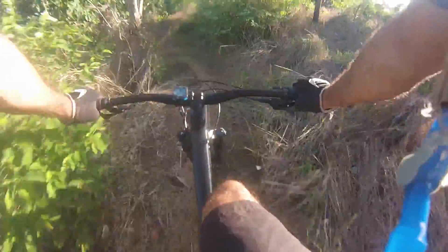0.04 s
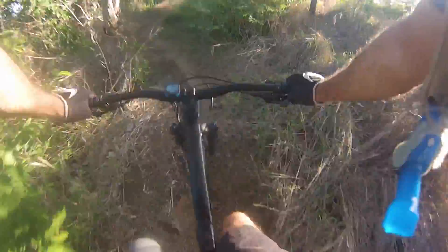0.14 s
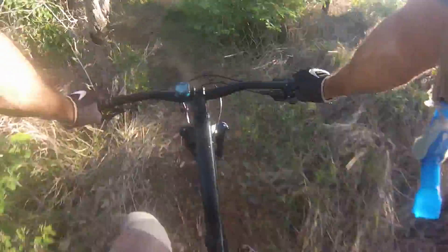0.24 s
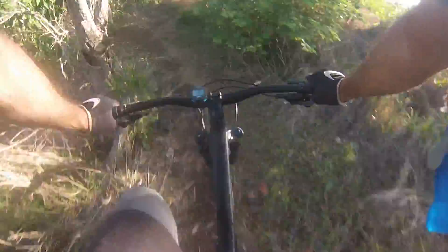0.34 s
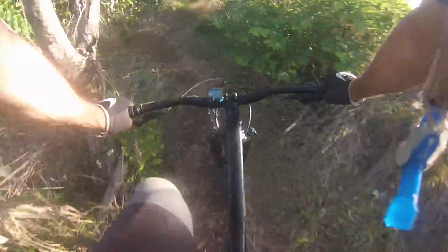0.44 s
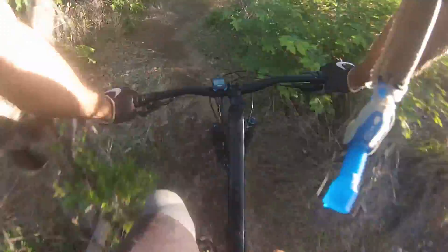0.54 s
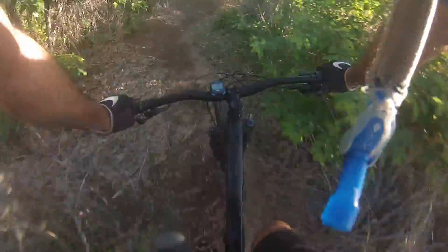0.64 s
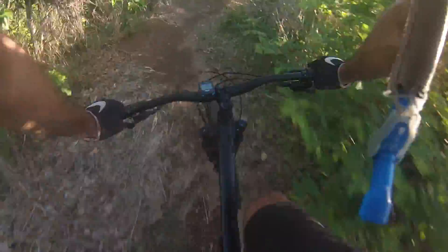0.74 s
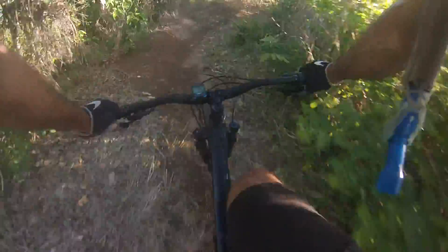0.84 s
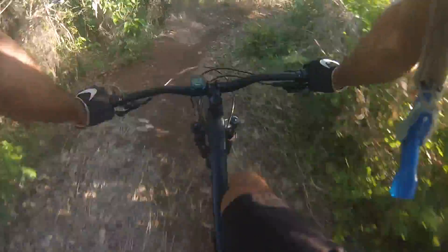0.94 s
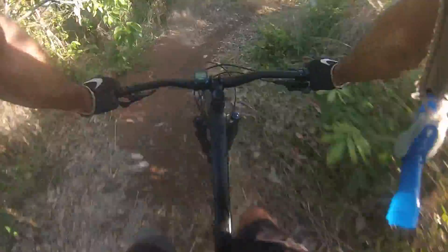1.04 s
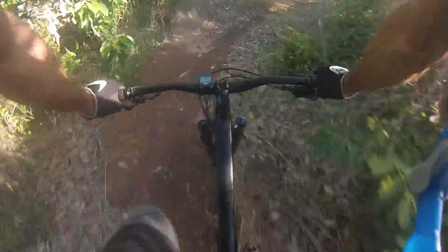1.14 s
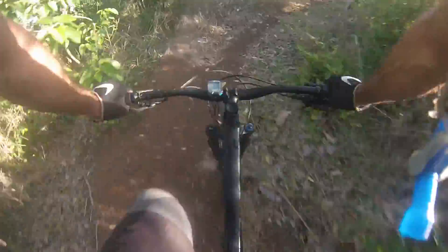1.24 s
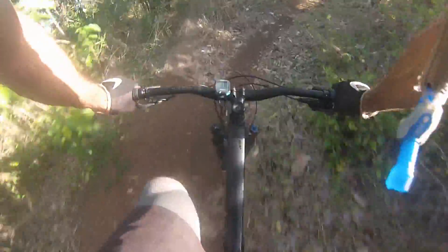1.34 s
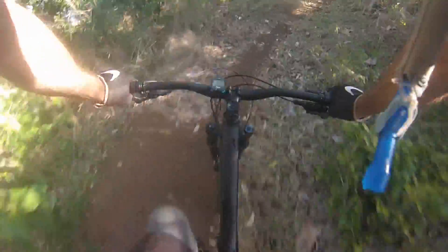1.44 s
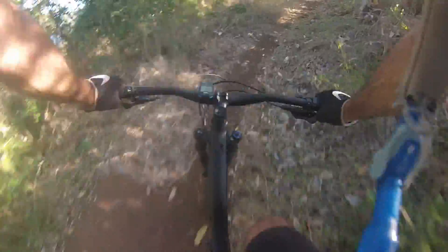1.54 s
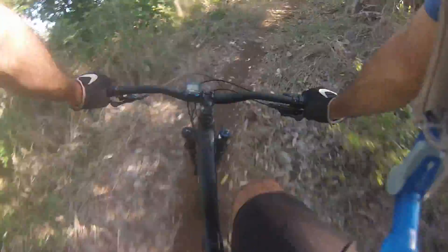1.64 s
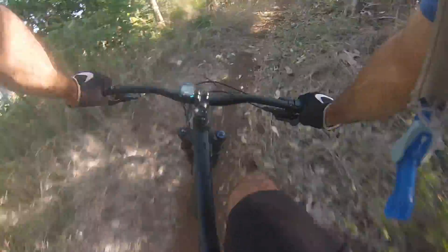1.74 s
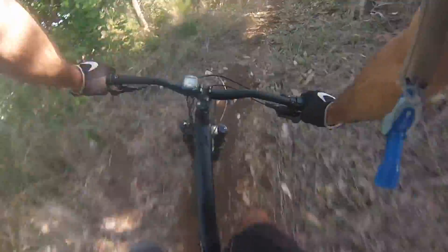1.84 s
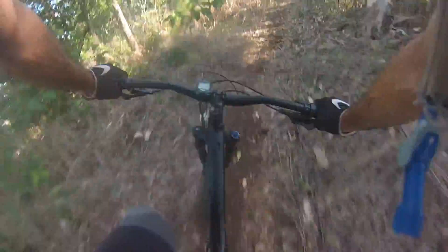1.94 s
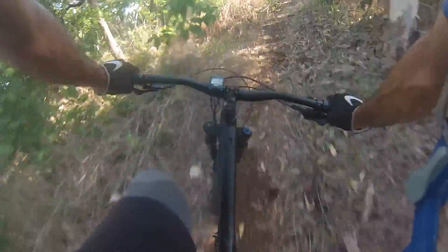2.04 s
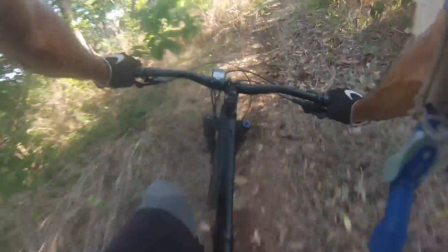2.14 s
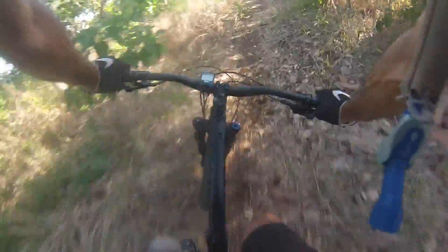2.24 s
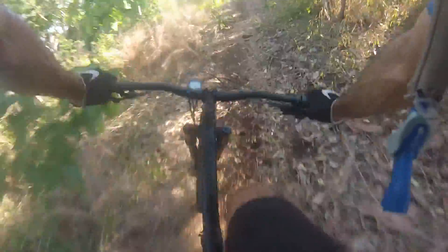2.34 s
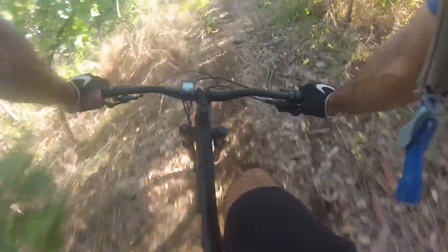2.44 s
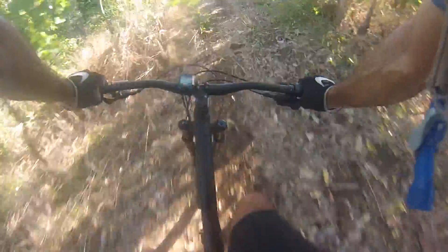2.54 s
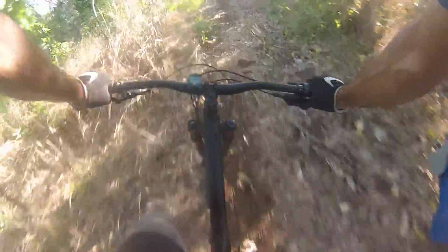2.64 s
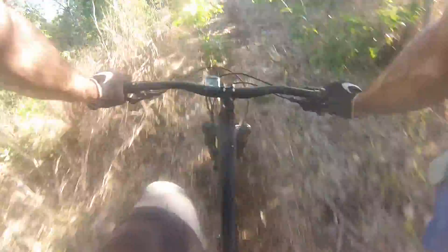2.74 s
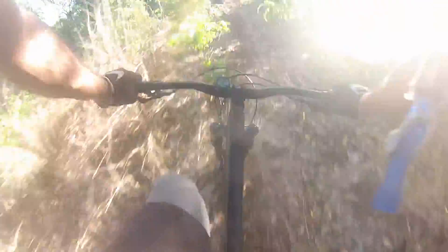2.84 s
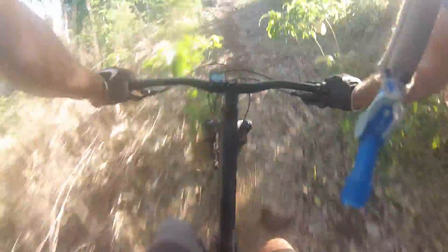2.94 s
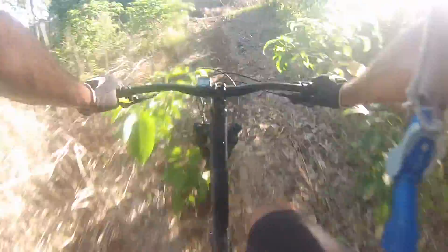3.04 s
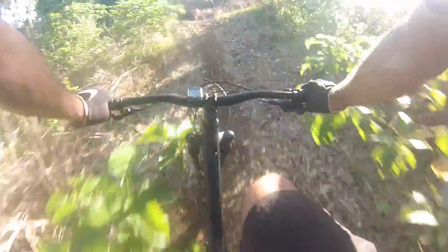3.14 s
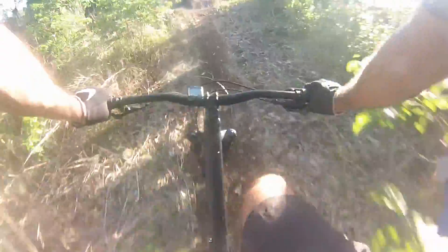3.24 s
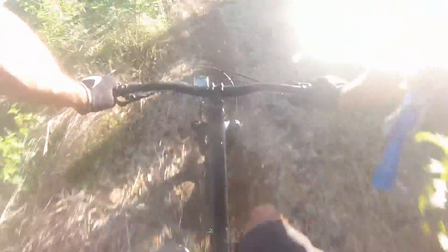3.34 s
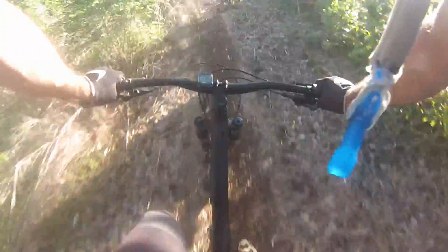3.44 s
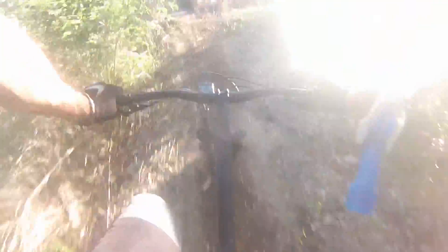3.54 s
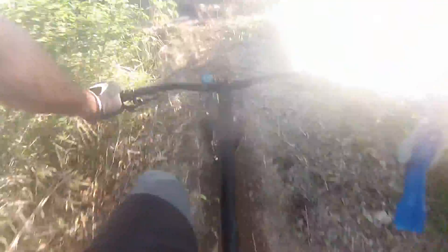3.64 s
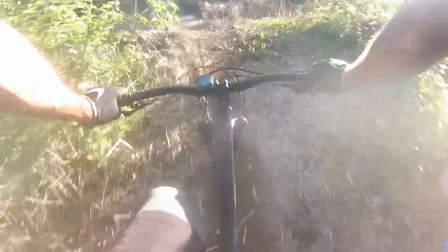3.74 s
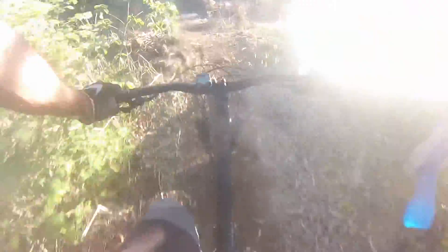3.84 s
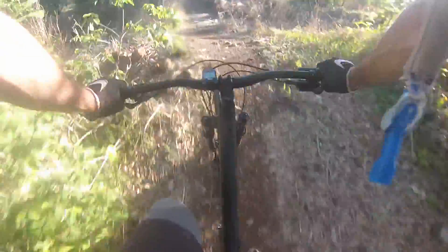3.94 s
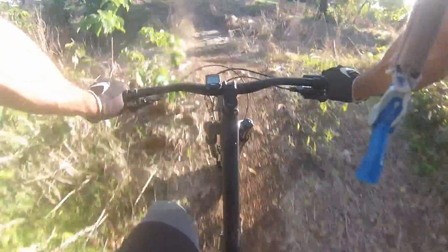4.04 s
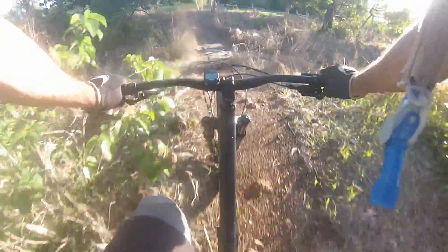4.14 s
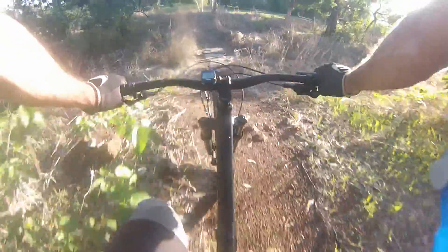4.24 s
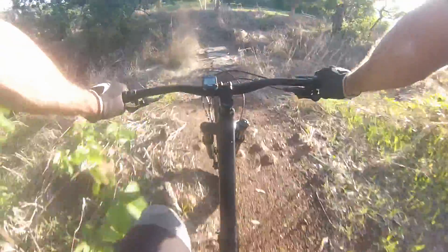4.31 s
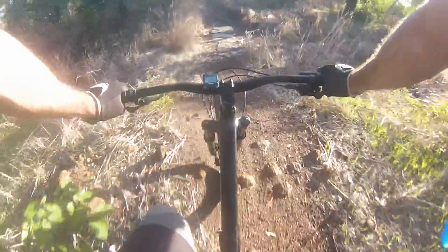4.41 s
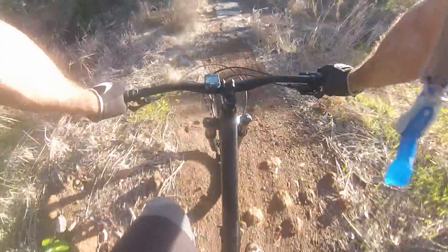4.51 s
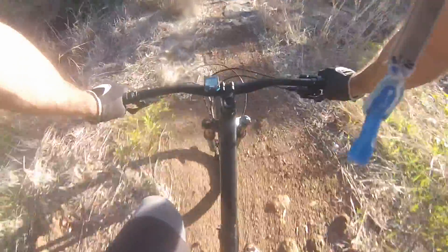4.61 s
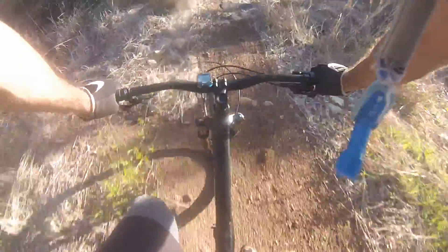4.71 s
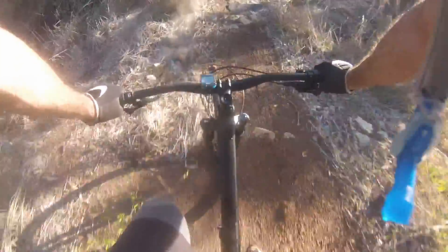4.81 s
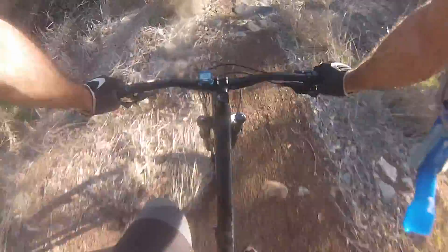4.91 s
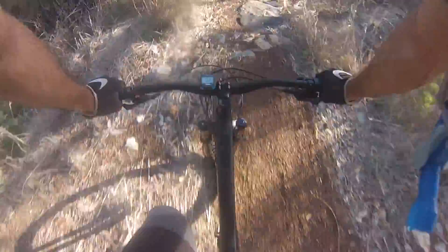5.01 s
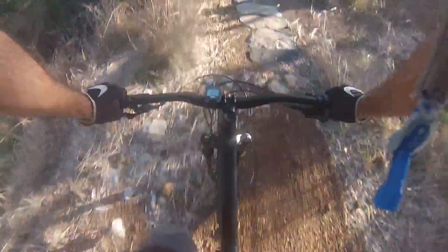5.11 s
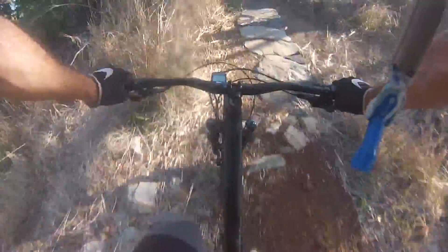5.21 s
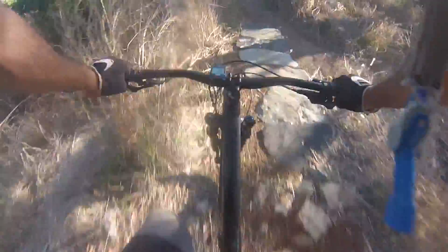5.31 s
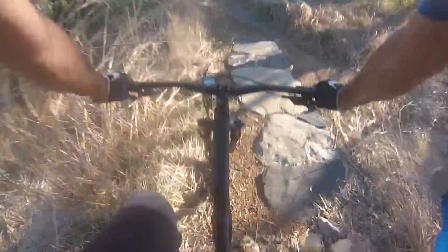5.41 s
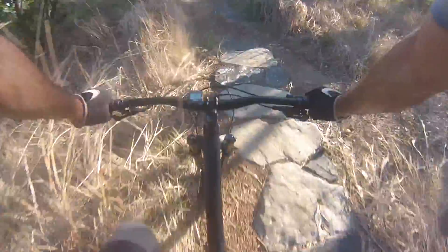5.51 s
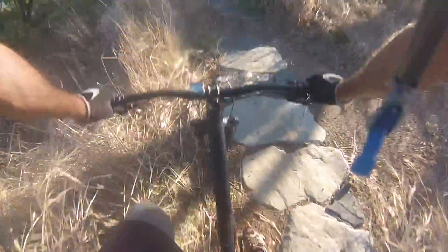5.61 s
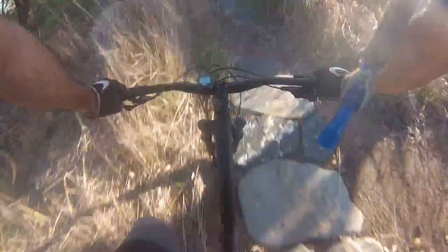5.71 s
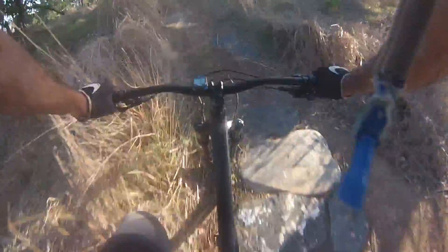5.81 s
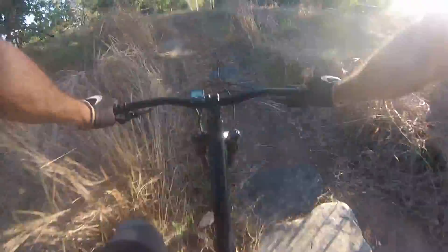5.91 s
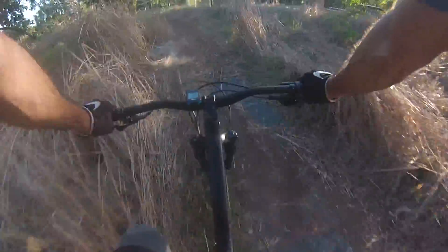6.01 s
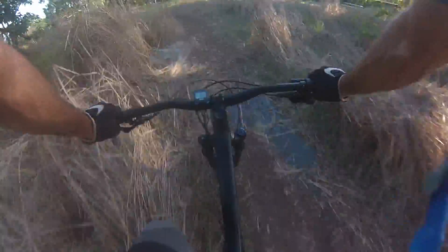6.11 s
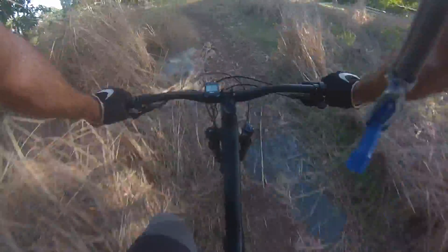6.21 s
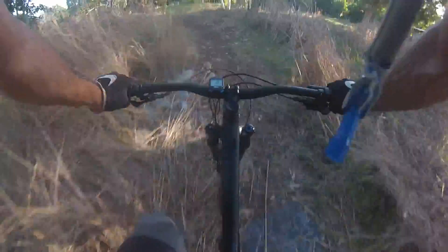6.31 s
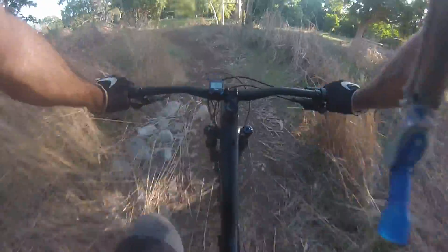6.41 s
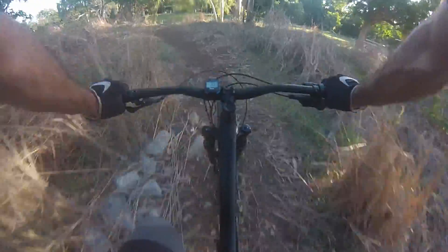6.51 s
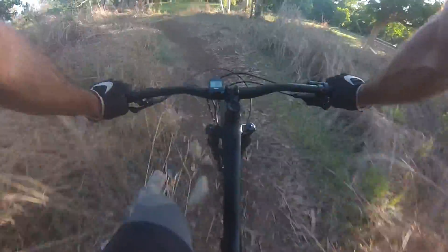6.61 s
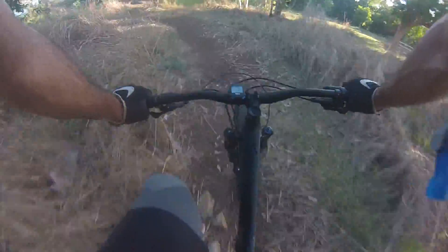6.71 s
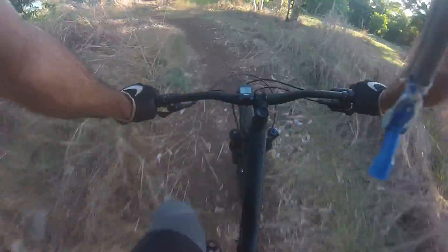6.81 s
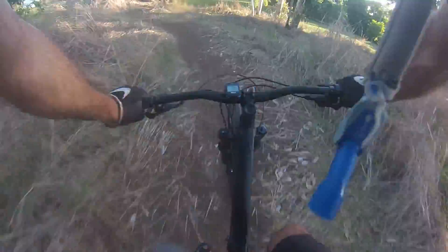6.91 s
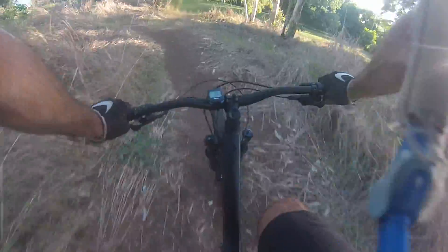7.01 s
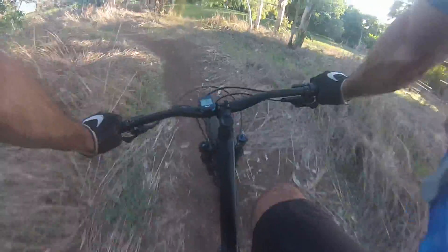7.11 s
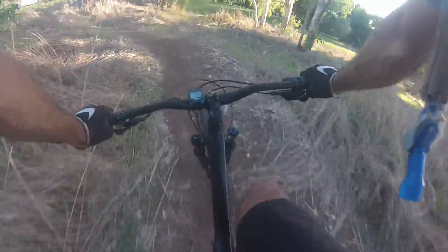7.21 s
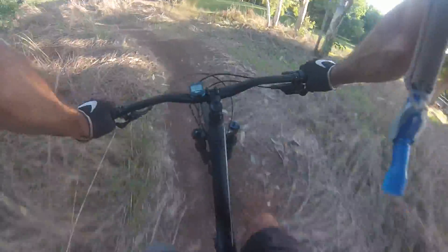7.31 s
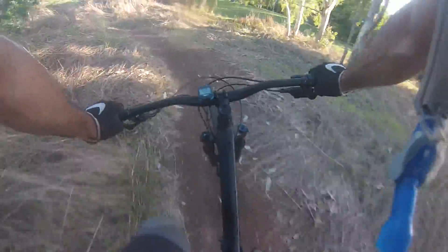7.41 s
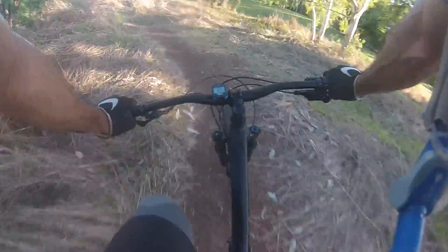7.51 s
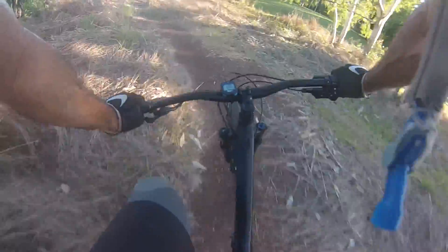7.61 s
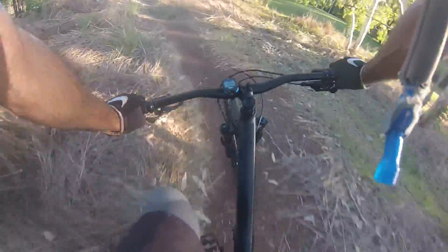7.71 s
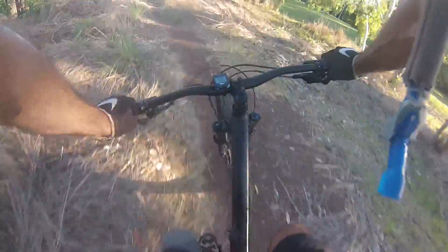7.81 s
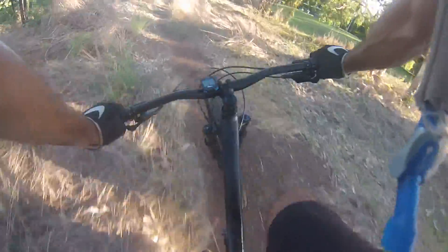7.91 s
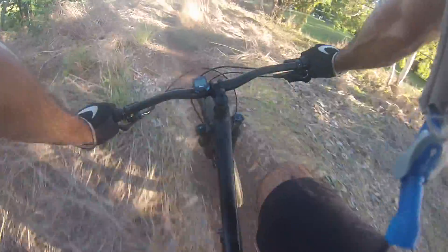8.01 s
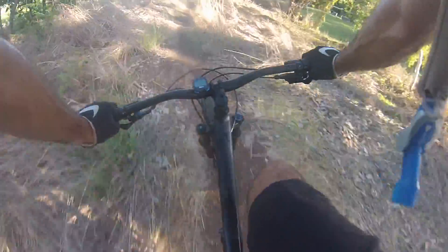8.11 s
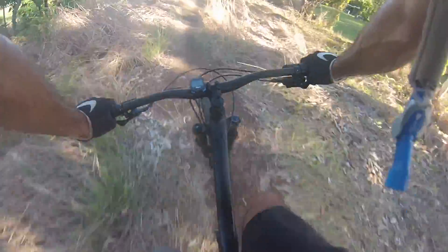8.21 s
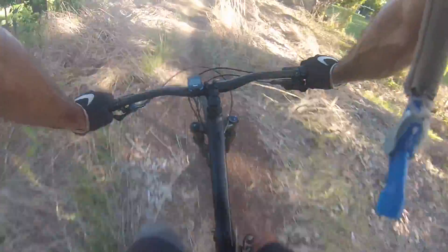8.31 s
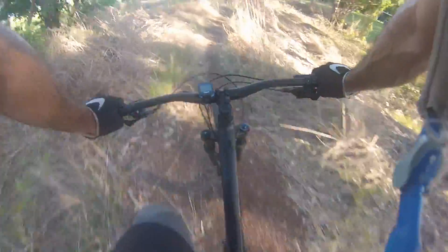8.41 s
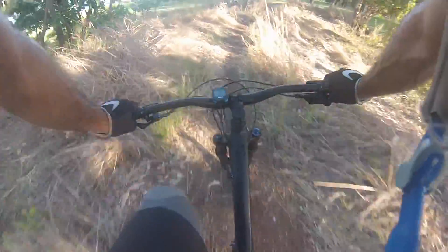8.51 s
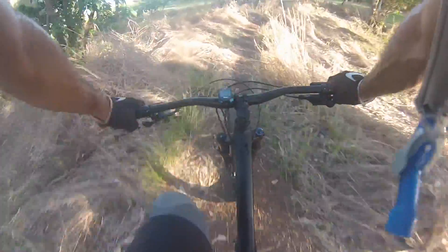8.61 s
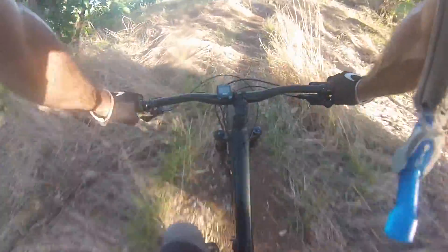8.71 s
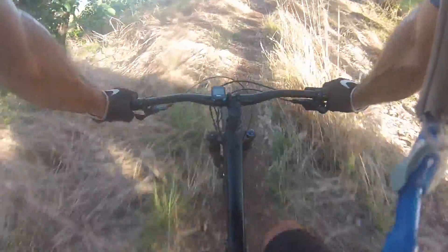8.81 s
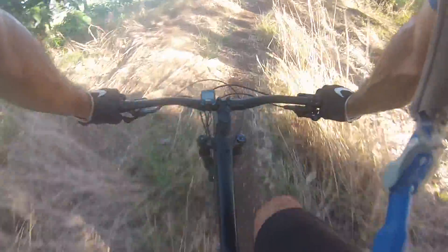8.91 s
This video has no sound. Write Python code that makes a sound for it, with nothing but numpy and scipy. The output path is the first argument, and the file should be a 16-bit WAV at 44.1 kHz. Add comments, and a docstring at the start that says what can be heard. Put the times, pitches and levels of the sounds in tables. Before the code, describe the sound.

A mountain bike rolls along a bumpy dirt trail, heard quiet and muffled from inside a closed camera case on the rider's chest. Tyres crunch over a low rumble, with small frame knocks and a fast, dull heartbeat underneath. Grass swishes and twigs flick the case. Just past the middle, stone slabs bring a cluster of heavy thumps and clatter, then the lighter crunching and rattling carries on.

```python
"""A bumpy dirt trail, heard from inside a closed camera case strapped to a rider's chest.
Brushing grass, tyre crunch and knocks arrive muffled and excite the resonances of case and frame.
The harness sways, hums and thuds, and the rider's heartbeat is conducted through it into the case.
Bumps throw the case back and forth; a stone slab gives a heavy jolt and a clatter."""
import sys
import numpy as np
from scipy import signal
from scipy.fft import rfft, irfft, next_fast_len
from scipy.io import wavfile

SR = 44100
rng = np.random.default_rng(int(sys.argv[2]) if len(sys.argv) > 2 else 0)


def output_pcm(signal):
    """Save a mono or channel-first signal as 16-bit PCM at the path in sys.argv[1].

    Samples are clipped to [-1, 1] before scaling.
    """
    pcm = np.clip(np.atleast_2d(signal).T, -1, 1) * 32767
    wavfile.write(sys.argv[1], SR, np.round(pcm).astype(np.int16))


N = 394682


def from_db(db):
    """Decibels to amplitude ratio."""
    return 10 ** (np.asarray(db) / 20)


def unit_rms(x):
    """Normalisation to rms 1."""
    return x / np.sqrt(np.mean(x ** 2) + 1e-20)


def curves(rows):
    """Linear interpolation of each column over time."""
    times_s, *columns = np.transpose(rows)
    return [np.interp(np.arange(N) / SR, times_s, column) for column in columns]


def lowpass(x, order, cutoff_hz):
    """Attenuation of the treble."""
    return signal.sosfilt(signal.butter(order, cutoff_hz, fs=SR, output="sos"), x)


def drift(rate_hz):
    """Slow random fluctuation: low-passed noise of rms 1."""
    step = 40
    pole = np.exp(-2 * np.pi * rate_hz * step / SR)
    slow = signal.lfilter([1], [1, -2 * pole, pole ** 2], rng.standard_normal(N // step + 2002))[2000:]
    return np.interp(np.arange(N) / step, np.arange(len(slow)), unit_rms(slow))


def coloured_noise(spectrum):
    """Spectral shaping of white noise, at rms 1."""
    hz, db = np.transpose(spectrum)
    size = next_fast_len(N)
    log_hz = np.log(np.arange(size // 2 + 1) * SR / size + 1)
    gain = from_db(np.interp(log_hz, np.log(hz), db))
    return unit_rms(irfft(rfft(rng.standard_normal(size)) * gain, size)[:N])


def resonate(force, modes, tilt_db=0):
    """Modal superposition with alternating signs, tilted by tilt_db per octave about 1800 Hz."""
    out = 0
    for k, (hz, width_hz, db) in enumerate(modes):
        radius = np.exp(-np.pi * width_hz / SR)
        zeros = (1 - radius ** 2) / 2 * np.array([1, 0, -1])
        poles = [1, -2 * radius * np.cos(2 * np.pi * hz / SR), radius ** 2]
        gain = from_db(db + tilt_db * np.log2(hz / 1800))
        out = out + (-1) ** k * gain * signal.lfilter(zeros, poles, force + 1e-18)
    return out


def grains(per_s, spread_db):
    """Shot noise: random contacts of uneven size."""
    sizes = from_db(spread_db * np.minimum(rng.exponential(1, N), 5)) * rng.choice([-1, 1], N)
    return sizes * (rng.random(N) < per_s / SR)


def impact(modes, decay_s, cutoff_hz, tilt_db=0):
    """Impact excitation: a brief rough force rings the modes; soft contact lowers its cutoff."""
    t = np.arange(SR // 5) / SR
    envelope = np.exp(-t / decay_s) * (1 - np.exp(-8 * t / decay_s))
    force = lowpass(rng.standard_normal(len(t)) * envelope, 4, cutoff_hz)
    return resonate(force, modes, tilt_db)


def add(out, start_s, sound, peak_db):
    """Superposition of a short sound at a given peak level."""
    i = round(start_s * SR)
    out[i:i + len(sound)] += (from_db(peak_db) * sound / np.abs(sound).max())[:N - i]


# Microphone noise: frequency_hz, density_db
HISS_SPECTRUM = [(500, 0.5), (1000, -12), (2600, -6.5), (3200, -4.5), (4500, -4.5), (7000, -11),
                 (11400, -10.5), (13000, -10)]

def microphone_hiss():
    """Self-noise of the microphone: a steady floor."""
    return from_db(-81) * coloured_noise(HISS_SPECTRUM)


# Resonances of the case's vent: pitch_hz, bandwidth_hz, gain_db
VENT_MODES = [(3098, 76, -8.5), (3694, 270, -12), (4950, 204, -14.5), (5713, 120, -9), (6210, 114, -6.5),
              (7240, 1020, -14.5), (8330, 1430, -19), (10800, 1300, -28.5)]
# Grass along the trail: time_s, level_db, crispness_db_per_octave
GRASS_SWISH = [(0, -80, -2), (.2, -85.5, 5), (1.3, -84.5, 6), (2.09, -82.5, 2), (2.42, -73, 4.5),
               (2.62, -78, 3.5), (3.3, -77, 0), (3.45, -82, 3), (3.7, -76.5, 2), (4.15, -75.5, 4.5),
               (4.38, -79, 7), (4.5, -81.5, 6.5), (5.05, -82.5, 6), (5.35, -78, -7), (5.7, -83.5, -5),
               (6.3, -83.5, 0), (6.86, -86.5, -5), (8.25, -87, -4), (8.95, -89, 3)]

def grass_swish(clumps):
    """Friction noise: brushing grass excites the vent's modes."""
    level_db, crisp_db = curves(GRASS_SWISH)
    swish = resonate(rng.standard_normal(N), VENT_MODES, crisp_db)
    swish /= from_db(crisp_db * np.log2(6200 / 1800))  # moves the tilt's pivot to 6200 Hz
    return from_db(level_db + 1.2 * clumps) * unit_rms(swish)


# Grass and twigs striking the case: start_s, peak_db, pitch_hz, decay_s, crispness_db_per_octave
TWIG_FLICKS = [(.0, -68, 3570, 0.11, -1), (0.141, -58.5, 3680, 0.0045, -6), (.184, -69, 6270, 0.0055, 0.1),
               (2.9014, -48, 3660, 0.0012, -25), (3.048, -67, 3600, 0.0074, -5),
               (3.235, -63, 5650, 0.033, -4), (3.266, -56, 5760, 0.046, -8), (3.303, -59, 3240, 0.014, 0),
               (3.338, -60, 6140, 0.028, -7), (3.367, -55.5, 5170, 0.0086, -16),
               (3.543, -64, 4470, 0.011, 10), (3.603, -56.5, 5540, .006, 1),
               (3.616, -52, 5840, 0.0018, -12.5), (3.729, -62, 5740, 0.011, -1),
               (3.751, -66, 3700, 0.013, -4), (3.894, -52.5, 6070, 0.0056, -4),
               (3.909, -49, 5720, 0.0034, 1), (5.39, -59.5, 3580, 0.006, -9),
               (5.516, -59.5, 3500, 0.016, -20), (5.804, -65, 3640, 0.0049, -3),
               (5.882, -64.5, 3960, 0.0069, -11), (7.831, -50.5, 4800, 0.0067, 14),
               (7.832, -53, 3620, 0.0064, 1), (8.623, -68, 3670, .006, -4)]

def twig_flicks():
    """Light impacts: each rings the vent's modes and one pitch of its own."""
    out = np.zeros(N)
    for start_s, peak_db, pitch_hz, decay_s, crisp_db in TWIG_FLICKS:
        modes = VENT_MODES + [(pitch_hz, 300, 0.5)]
        add(out, start_s, impact(modes, decay_s, cutoff_hz=12400, tilt_db=crisp_db), peak_db)
    return out


# Resonances of case and frame: pitch_hz, bandwidth_hz, gain_db
CASE_MODES = [(1142, 228, -7.5), (1382, 121, 4), (1922, 170, 0.5)]
FRAME_MODES = [(2082, 96, 3.5), (2352, 240, 1), (3674, 97, -12)]
# Ground under the tyres: time_s, level_db, hardness_db_per_octave, frame_gain_db
TRAIL_SURFACE = [(0, -72, 3, 0), (.25, -73, -1, -1), (.6, -76, -3, -3), (.95, -69.5, 0.5, -5),
                 (1.08, -77.5, 7, -2), (1.15, -72, -7, -4.5), (1.48, -73, -6.5, -2.5),
                 (1.6, -69, -6.5, -2.5), (2.07, -67, -4, -4.5), (2.58, -68, 1, -2.5),
                 (2.66, -72.5, -9, -3.5), (2.95, -67, -5, -4.5), (3.2, -65, 7, -6), (3.3, -62, -1.5, -1),
                 (3.43, -70.5, -5, -4), (3.75, -62.5, 5.5, -4.5), (4.22, -72, -3, -0.5), (4.5, -76, 9, -3),
                 (5.05, -72.5, -4, -0.5), (5.22, -64, 0.5, -5.5), (5.42, -64, 4.5, -2.5),
                 (5.62, -64.5, 2, 2), (5.75, -70, 4, 0.5), (5.82, -64, 1.5, 2), (6.08, -74, 2, -4),
                 (6.4, -73.5, 2, -1), (6.8, -66, 2, -5.5), (7.2, -63, 10.5, -7), (7.3, -72, -2.5, -4.5),
                 (7.7, -70.5, -2, -7.5), (8.06, -63, 10.5, -13), (8.12, -69.5, 4, -9), (8.3, -67.5, 0, -5),
                 (8.75, -73.5, 4, -3.5), (8.95, -70, 1, -6.5)]

def tyre_crunch(clumps):
    """Granular noise: dirt, dry leaves and stones under the tyres ring the case and frame."""
    level_db, hard_db, frame_db = curves(TRAIL_SURFACE)
    grit = unit_rms(grains(900 * from_db(3.0 * clumps), spread_db=3.0)) + 1.02 * rng.standard_normal(N)
    grit += 0.45 * unit_rms(grains(70, spread_db=2.5))  # pebbles and twigs snap
    muffled = lowpass(grit, 3, cutoff_hz=2620)  # transmission loss of the case wall
    case_ring = resonate(muffled, CASE_MODES, hard_db + 2.1 * drift(14))
    frame_clang = from_db(frame_db) * resonate(muffled, FRAME_MODES)
    return from_db(level_db + 1.74 * drift(25)) * unit_rms(case_ring - frame_clang)


# Knocks on frame and case: start_s, peak_db, hardness_db_per_octave
FRAME_KNOCKS = [(0.1402, -42.5, -2), (0.183, -55, -13), (0.229, -55, 11), (0.7562, -55, -2),
                (1.36, -55.5, -16), (2.191, -51, -8), (2.904, -54, 21), (3.0812, -47, -2), (3.185, -49, 0),
                (3.248, -48, -3), (3.2835, -47, -1), (3.6186, -35.5, 4), (3.701, -52, 3), (3.736, -49, 5),
                (3.761, -49, 3), (4.989, -51, -10), (5.2032, -50.5, -4), (5.391, -49.5, -7),
                (5.513, -49, 27), (5.627, -57, 5), (5.6798, -48, 12), (5.7727, -49.5, 16), (5.889, -46, 19),
                (6.1463, -53.5, 17), (6.785, -58, 0), (6.8702, -49, -4), (7.0544, -53, 4), (7.1244, -53, 9),
                (7.1766, -53, 8), (7.7519, -50.5, -1), (7.832, -53.5, 0), (7.877, -55, -9),
                (7.9908, -52.5, -7), (8.2915, -50.5, -15)]

def frame_knocks():
    """Free vibration of case and frame: harder contacts favour the higher modes."""
    out = np.zeros(N)
    modes = CASE_MODES + [(hz, width_hz, db - 4.5) for hz, width_hz, db in FRAME_MODES]
    for start_s, peak_db, hard_db in FRAME_KNOCKS:
        add(out, start_s, impact(modes, decay_s=0.0016, cutoff_hz=2360, tilt_db=hard_db), peak_db)
    return out


# Resonances of harness and buckle: pitch_hz, bandwidth_hz, gain_db
HARNESS_MODES = [(114.5, 13.4, 9.5), (172.6, 128, -7), (270, 150, -15.5)]
BUCKLE_MODES = [(373, 37.6, 4.5), (678, 130, -3.5), (910, 285, -1.5)]
# Tyre rumble: frequency_hz, density_db
RUMBLE_SPECTRUM = [(100, -20.5), (180, -5.5), (260, -4.5), (400, -5.5), (600, -8.5), (900, -8), (1100, -22),
                   (2000, -48.5)]
# Shaking of the body: time_s, hum_db, rumble_db
SHAKING = [(0.0, -64.5, -73.5), (0.74, -69.5, -81), (0.92, -66.5, -78), (1.57, -73.5, -75.5),
           (2.34, -63.5, -75), (2.54, -67.5, -73), (3.11, -71, -74), (3.66, -64.5, -75), (3.84, -71.5, -75),
           (4.41, -72.5, -79.5), (4.98, -69, -74.5), (5.36, -62.5, -68.5), (5.56, -47.5, -64.5),
           (5.71, -54, -64.5), (6.08, -65, -77), (6.53, -66.5, -76.5), (7.2, -74.5, -76.5),
           (7.48, -70.5, -79.5), (7.78, -70.5, -76.5), (8.95, -69, -79.5)]

def hum_and_rumble(clumps):
    """Structure-borne sound: the harness hums and tyre rumble travels up the frame."""
    hum_db, rumble_db = curves(SHAKING)
    shudder = drift(14)  # loose ground shakes harness and frame together
    hum = unit_rms(resonate(rng.standard_normal(N), HARNESS_MODES))
    buckle_ring = unit_rms(resonate(rng.standard_normal(N), BUCKLE_MODES))
    rumble = unit_rms(coloured_noise(RUMBLE_SPECTRUM) + 0.51 * buckle_ring)
    rumble *= from_db(rumble_db + 0.9 * shudder + 1.34 * clumps)
    return from_db(hum_db + 2.0 * shudder) * hum + rumble


# Blows into the harness: start_s, peak_db, pitch_hz, buckle_relative_db, hardness_db_per_octave
HARNESS_THUDS = [(0.235, -51.5, 115, -10, -6), (0.96, -56, 112, -14, -3), (1.71, -54, 112, -16, -3),
                 (3.62, -53, 115, -3, 2), (5.234, -52.5, 107, -6, -2), (5.364, -52, 108, -7, 8),
                 (5.39, -48, 120, -5.5, .3), (5.467, -43.5, 118, -21, -16), (5.511, -39.5, 175.4, 0, -2.5),
                 (5.595, -41, 102, -22, -4), (5.623, -31, 116, -17.5, 6), (5.647, -47.5, 107, 1, -10),
                 (5.66, -28.5, 118, -34, -11), (5.679, -47, 120, -2.5, -7), (5.706, -41, 121, -8.5, -10),
                 (5.799, -49, 116, -5, -5), (5.885, -36, 110, -4.5, -6.5), (6.01, -52, 119, -27, 2),
                 (6.118, -49, 110, -3, -15), (6.241, -52, 105, -12, -17), (7.488, -52, 116, -24, -5)]

def harness_thuds():
    """Damped resonance: a soft blow excites one low harness mode and rings the buckle."""
    out = np.zeros(N)
    for start_s, peak_db, pitch_hz, buckle_db, hard_db in HARNESS_THUDS:
        thud = impact([(pitch_hz, 45, 0)], decay_s=0.0066, cutoff_hz=256)
        add(out, start_s, resonate(thud, [(pitch_hz, 90, 0)]), peak_db)
        buckle_ring = impact(BUCKLE_MODES, decay_s=0.0053, cutoff_hz=1190, tilt_db=hard_db)
        add(out, start_s, buckle_ring, peak_db + buckle_db)
    return out


# Motion of the harness: frequency_hz, density_db
SWAY_SPECTRUM = [(4, -11), (8, 9.5), (16, 6), (27, 5), (45, -15), (80, -14.5), (160, -82)]
# Strength of the sway: time_s, level_db
SWAY_LEVELS = [(0, -42), (.2, -56), (.3, -47), (.76, -61.5), (.99, -40), (1.2, -52.5), (1.4, -52),
               (1.85, -49), (2.26, -56), (2.34, -42.5), (2.55, -39.5), (2.86, -57), (3.04, -44),
               (3.44, -59), (3.62, -41), (3.84, -51.5), (4.5, -48), (4.9, -48.5), (5.12, -39),
               (5.76, -36.5), (5.93, -43), (6.03, -45), (6.25, -49.5), (6.58, -40.5), (6.68, -49.5),
               (7.3, -54.5), (8.05, -49), (8.2, -55), (8.4, -51), (8.95, -54)]

def harness_sway():
    """Random vibration, largely infrasonic, as the case sways on its harness."""
    level_db, = curves(SWAY_LEVELS)
    return from_db(level_db + 1.7 * drift(3.1)) * coloured_noise(SWAY_SPECTRUM)


# Closures of the first heart valve: time_s, peak_db
HEARTBEATS = [(0.1552, -42), (0.5218, -43.5), (0.8942, -40.5), (1.265, -46), (1.635, -42.5), (2.006, -45.5),
              (2.378, -46.5), (2.7554, -44), (3.127, -39), (3.497, -42), (3.8704, -46), (4.245, -43),
              (4.617, -41), (4.9863, -42.5), (5.3577, -38), (6.114, -42.5), (6.4884, -43.5), (6.868, -43.5),
              (7.247, -42.5), (7.6258, -45), (8.003, -44), (8.3809, -43), (8.7524, -39.5)]

def heartbeat():
    """Valve transients: two closures each pull the chest wall in, with a rebound either side."""
    out = np.zeros(N)
    width_s, lead_s = 0.0034, 0.02
    u = np.arange(-lead_s * SR, lead_s * SR) / SR / width_s
    pull = (u ** 2 - 1) * np.exp(-u ** 2 / 2) + 0.29 * u * np.exp(-u ** 2 / 4)
    for time_s, peak_db in HEARTBEATS:
        add(out, time_s - lead_s, pull, peak_db)
        delay_s, relative_db = rng.normal(0.0214, 0.0038), rng.normal(-4, 2.5)  # second valve
        add(out, time_s + delay_s - lead_s, pull, peak_db + relative_db)
    return out


# Bumps in the trail: centre_s, peak_db, swing_s
BUMPS = [(0.119, -41, 0.023), (0.254, -32, 0.023), (0.971, -39.5, 0.051), (2.344, -33.5, 0.02),
         (2.438, -38.5, 0.042), (3.985, -43.5, 0.025), (4.489, -44, 0.022), (4.919, -38.5, 0.021),
         (5.252, -31.5, 0.018), (5.534, -16, 0.012), (5.619, -27, 0.023), (5.728, -25.5, 0.017),
         (7.579, -48, 0.031)]

def case_jolts():
    """Shock response: a bump swings the case back, then more weakly forth, swing_s later."""
    out = np.zeros(N)
    lead_s = 0.1
    t = np.arange(-lead_s * SR, lead_s * SR) / SR
    for centre_s, peak_db, swing_s in BUMPS:
        u = 2 * t / swing_s
        swing = (u - 0.12) * np.exp(-u ** 2 / 2) + 0.051 * np.exp(-u ** 2 / 12)
        add(out, centre_s - lead_s, swing, peak_db)
    return out


def scene():
    """Superposition of all sources at one microphone inside the case."""
    clumps = drift(20)  # loose dirt comes in clumps
    trail = grass_swish(clumps) + twig_flicks() + tyre_crunch(clumps) + frame_knocks()
    harness = hum_and_rumble(clumps) + harness_thuds() + harness_sway()
    return (trail + harness + heartbeat() + case_jolts())[None]


def record(dry):
    """Band limiting: sound and microphone hiss are cut off above 13050 Hz."""
    return signal.sosfilt(signal.cheby2(12, 30, 13050, fs=SR, output="sos"), dry + microphone_hiss())


dry = scene()
out = record(dry)
output_pcm(out)
```